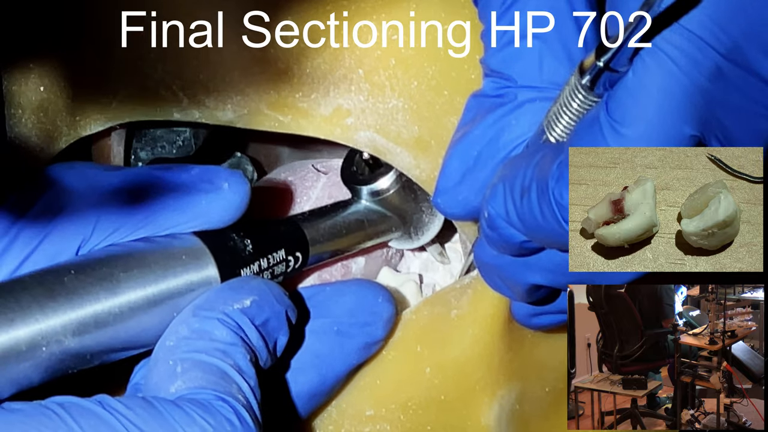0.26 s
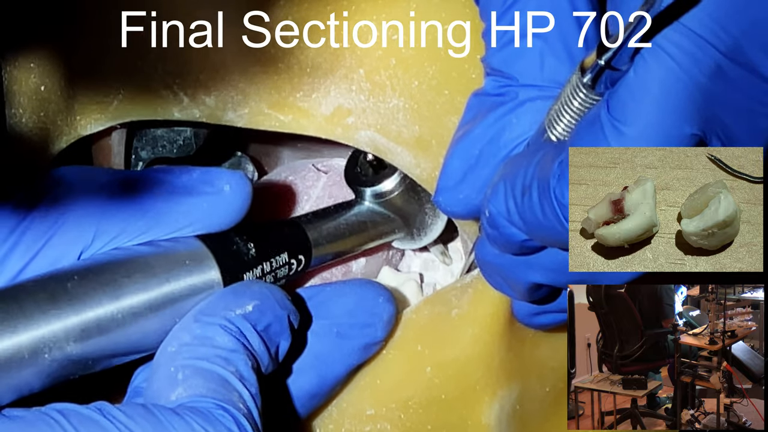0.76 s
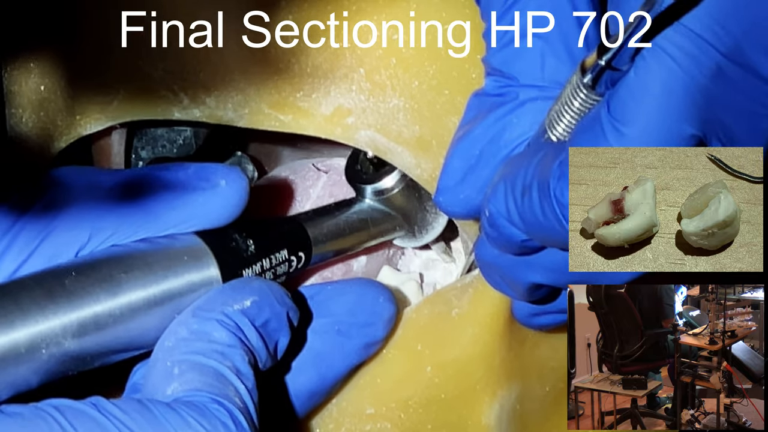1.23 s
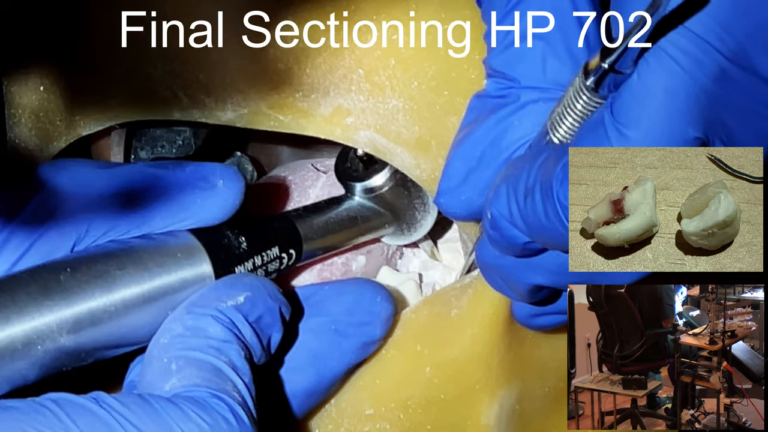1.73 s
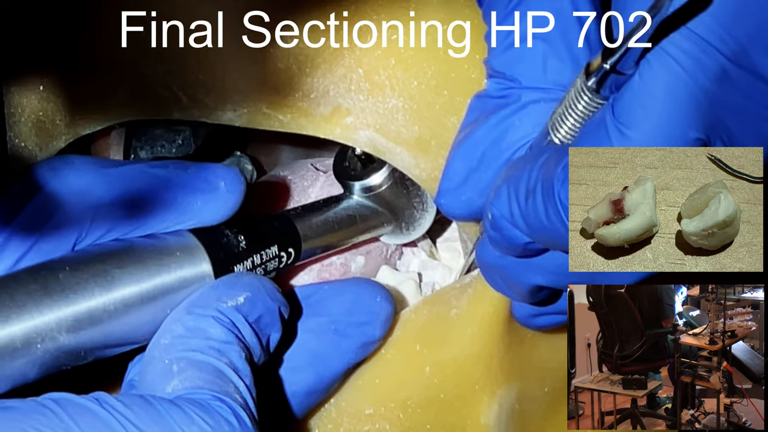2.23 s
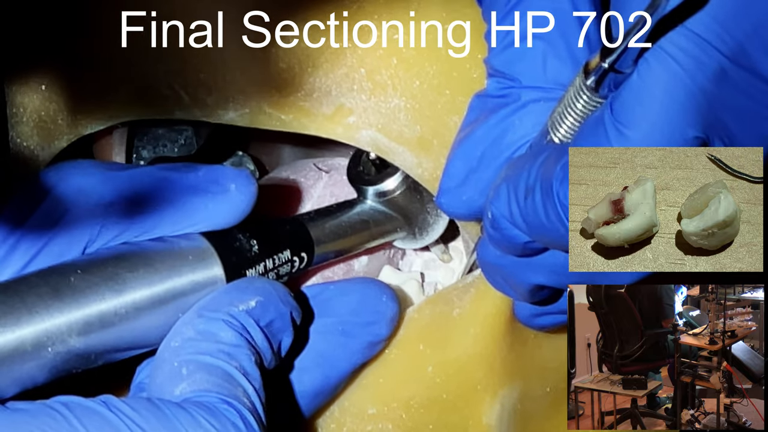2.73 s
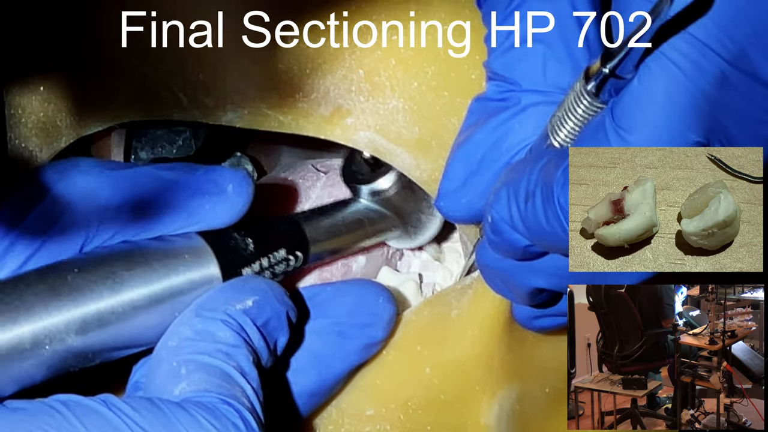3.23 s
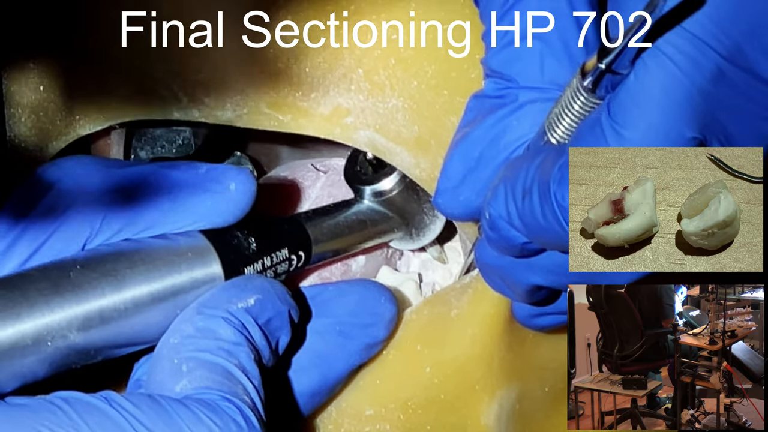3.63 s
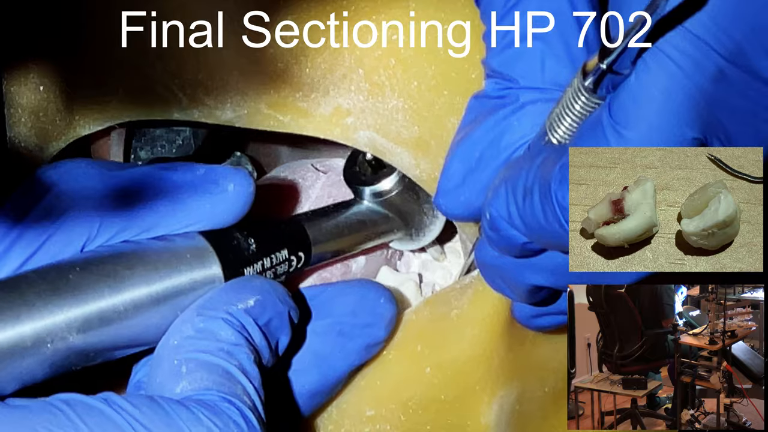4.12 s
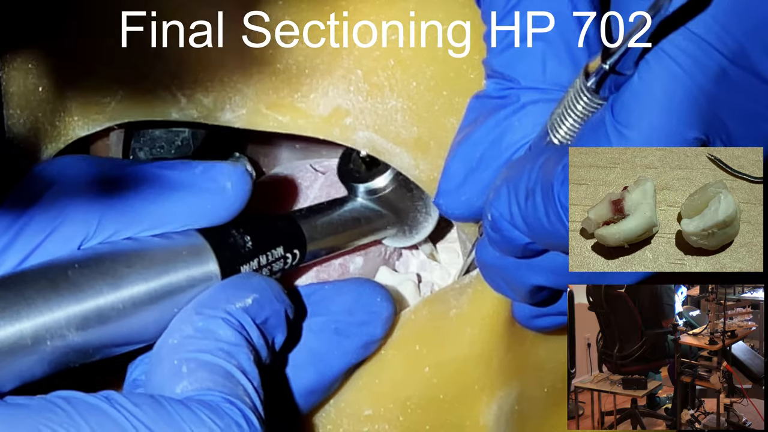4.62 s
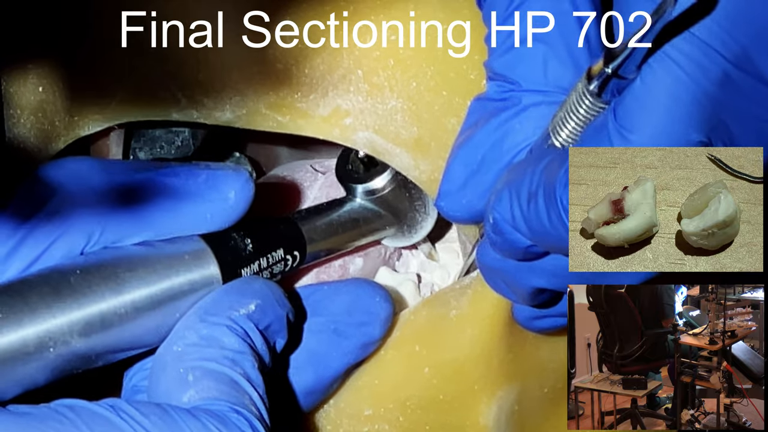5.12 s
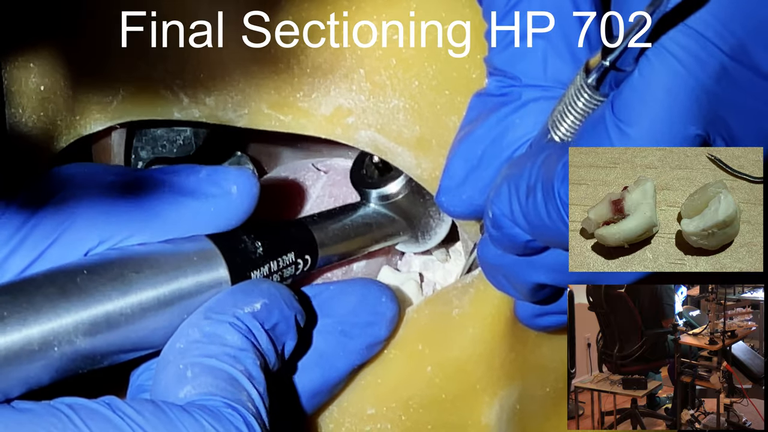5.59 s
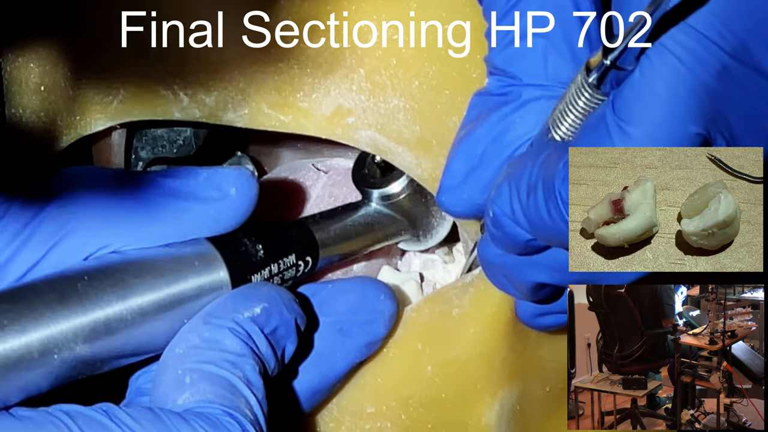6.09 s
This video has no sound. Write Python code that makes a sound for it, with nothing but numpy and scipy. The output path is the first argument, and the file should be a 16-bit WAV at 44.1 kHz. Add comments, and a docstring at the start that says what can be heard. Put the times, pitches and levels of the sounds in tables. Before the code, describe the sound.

Continuous handpiece noise, close and dry with a trace of small room. A buzzy drone opens loud and airy; then a steady hum comes forward while the rush thins a little. An extra mid-low tone swells near one second, then throbs and fades. Fine high hiss rides on top, swelling as the bur bites into the hard tooth, with brief scratchy rattles, mostly early, and a few late.

```python
"""At a workbench, close to a two-port microphone, a small electric dental motor creeps up in speed
while its bur cuts a model tooth. The shaft hums, beats with the mains ripple and whines at its gear
orders: sines locked to the shaft angle. Shaped noise makes the rushing drone around it.
The bur's hiss is noise swelling once a turn through resonances; it bites in swells and chatters in
bursts of blows, and two soft, low bumps come through the bench."""
import sys
import numpy as np
from scipy import signal
from scipy.fft import rfft, irfft, next_fast_len
from scipy.io import wavfile
from scipy.ndimage import uniform_filter1d, map_coordinates

SR = 44100
rng = np.random.default_rng(int(sys.argv[2]) if len(sys.argv) > 2 else 0)


def digitize_waveform(pressure):
    """Quantize a signal to 16-bit integers and store it at the path in sys.argv[1].

    Rows of a 2-D input are taken as channels; values are limited to [-1, 1].
    """
    field = np.atleast_2d(pressure).T
    bounded = np.clip(field, -1, 1)
    quanta = np.round(bounded * 32767).astype(np.int16)
    wavfile.write(sys.argv[1], SR, quanta)


N = 280102  # samples
RIPPLE_HZ = 120  # torque ripple, twice the mains frequency


def amp(db):
    """Decibel law: a level in dB as an amplitude ratio."""
    return 10 ** (np.asarray(db) / 20)


def unit(x):
    """Normalisation to an rms of 1."""
    return x / np.sqrt(np.mean(x ** 2) + 1e-20)


def along(points, hz):
    """Interpolation of each column after the frequency, on a logarithmic frequency axis."""
    f, *columns = np.transpose(points)
    return [np.interp(np.log(hz + 1), np.log(f + 1), column) for column in columns]


def curves(rows):
    """Linear interpolation in time: one value per sample for each column after the time."""
    s, *columns = np.transpose(rows)
    return [np.interp(np.arange(N) / SR, s, column) for column in columns]


def wobble(rate):
    """Slow random modulation: a smooth curve through about `rate` random knots a second."""
    coarse = np.arange(0, N + 64, 64)
    knots = rng.standard_normal(int(N * rate / SR) + 4)
    smooth = map_coordinates(knots, [coarse * rate / SR])
    return np.interp(np.arange(N), coarse, smooth)


def filtered(x, response):
    """Linear filtering: the spectrum of x times a complex response of frequency."""
    m = next_fast_len(N + SR // 2)
    return irfft(rfft(x, m) * response(np.fft.rfftfreq(m, 1 / SR)), m)[..., :N]


def rush(spectrum, patchy_db):
    """Turbulence-like noise: two unrelated noises sharing one colour and patches of random gain, rms 1."""
    z = signal.stft(rng.standard_normal((2, N)), nperseg=512)[2]
    field = uniform_filter1d(rng.standard_normal(z.shape[1:]), 6, 0)  # smoothed over frequency
    field = uniform_filter1d(field, 14, 1)  # then over time
    pair = signal.istft(z * amp(patchy_db * unit(field)), nperseg=512)[1][:, :N]
    return unit(filtered(pair, lambda hz: amp(along(spectrum, hz)[0])))


def resonate(x, hz, width):
    """Resonance: a damped second-order band-pass applied twice, brought to rms 1."""
    def response(f):
        return (1j * f * width / (hz * hz - f * f + 1j * f * width)) ** 2
    return unit(filtered(x, response))


def shaft_speed():
    """Rotation rate of the shaft in Hz, creeping upward."""
    # Run-up of the shaft: t/s, speed f/Hz
    speed_points = [(0.0, 324.48), (0.4, 326.16), (0.8, 327.7), (1.1, 328.51), (1.5, 329.67), (1.8, 330.68),
                    (2.2, 331.52), (2.5, 331.87), (3.0, 332.76), (3.6, 333.55), (4.0, 333.91),
                    (4.4, 334.35), (4.8, 334.76), (5.15, 334.73), (5.5, 335.37), (5.9, 335.6),
                    (6.3, 336.09)]
    return curves(speed_points)[0]


def gained():
    """Speed increment: Hz of shaft speed gained since the start."""
    speed = shaft_speed()
    return speed - speed[0]


def shaft_angle():
    """Integration of speed: radians turned by the shaft."""
    return 2 * np.pi * np.cumsum(shaft_speed()) / SR


def shaft_orders(angle):
    """Order tones: harmonics of rotation, here the shaft tone and the gear whines at orders 12 and 22."""
    # Strong orders: t/s, shaft tone level/dB, order 12 level/dB, order 22 level/dB
    order_levels = [(0, -47, -54, -54), (.25, -39, -66, -57), (.48, -34, -63, -56), (.62, -32.5, -53, -56),
                    (.82, -30.5, -50.5, -59), (.88, -29.5, -51, -49.5), (1.2, -28.5, -58, -49),
                    (1.62, -26, -48.5, -53.5), (1.72, -24.5, -50, -53), (1.85, -24.5, -62, -53.5),
                    (2.2, -24.5, -65, -53), (2.75, -23.5, -70, -49.5), (2.92, -23.5, -60, -51),
                    (3.05, -23, -58, -54), (3.4, -23.5, -53.5, -51.5), (4.2, -23.5, -55, -53),
                    (5.0, -24, -52.5, -51), (5.3, -23.5, -53.5, -51.5), (5.5, -24.5, -62, -51.5),
                    (6.1, -23.5, -61.5, -49.5), (6.35, -23.7, -57, -52)]
    # Depth of random flutter for the same three tones: depth/dB; gear whines waver most
    flutter_depths = [0.35, .84, 1.05]
    tones = np.zeros(N)
    for order, db, depth_db in zip((1, 12, 22), curves(order_levels), flutter_depths):
        tones += amp(db + depth_db * wobble(16)) * np.sin(order * angle)
    return tones


def side_tones(angle, ripple):
    """Intermodulation: sums and differences of order and ripple phases; some are pure orders or ripple."""
    # Tones that grow or fade with speed: shaft order, multiple of the ripple, level at start/dB,
    # slope/(dB per Hz of speed gained), flutter depth/dB, slow swing depth/dB
    side_rows = [(1, -1, -63, 1.08, 1.9, 0.2), (1, 1, -45.5, -0.72, 1.5, 1.7), (2, 0, -49, -.5, 1.2, 0.5),
                 (0, 1, -54.5, -.5, 3, 1), (30, 0, -58, -0.38, 0.5, 2.5), (1, 2, -47, -2.3, 0.5, 3),
                 (21, 0, -63, -1, 4, 5)]
    tones = np.zeros(N)
    for order, multiple, db, slope_db, flutter_db, swing_db in side_rows:
        level_db = db + slope_db * gained() + flutter_db * wobble(16) + swing_db * wobble(3.047)
        tones += amp(level_db) * np.sin(order * angle + multiple * ripple)
    return tones


def faint_orders(angle):
    """Weak rotational harmonics: the faint orders come and go as the load shifts."""
    # Faint orders: shaft order, mean level/dB
    faint_rows = [(3, -79), (8, -70), (10, -71), (15, -92), (16, -76), (18, -77), (23, -87), (24, -75),
                  (26, -72), (27, -68.5), (37, -81)]
    # order ** 2 only scatters the starting phases
    return sum(amp(db + 2.0 * wobble(1.5)) * np.sin(order * angle + order ** 2) for order, db in faint_rows)


def resonant_db():
    """Resonance crossing: the level climbs to a sharp peak in speed, then falls and throbs by interference."""
    peak_speed_hz, peak_db, rounding_hz = 329, -31.5, 0.33  # rounding lowers and blunts the peak
    climb_db_per_hz, fall_db_per_hz = 5.5, 4
    throb_from_s, throb_grows_s, throb_share = 1.36, 0.19, 0.37
    first_dip_s, throb_per_s, throb_gain_per_s2 = 1.67, 1.75, .76  # rate at the first dip, and its growth
    t = np.arange(N) / SR
    past = shaft_speed() - peak_speed_hz
    away_db = np.hypot(past, rounding_hz) * np.where(past < 0, climb_db_per_hz, fall_db_per_hz)
    share = throb_share * np.clip((t - throb_from_s) / throb_grows_s, 0, 1)
    since_dip = t - first_dip_s
    cycles = since_dip * (throb_per_s + throb_gain_per_s2 * since_dip / 2)
    throb_db = 20 * np.log10(np.abs(1 - share * np.exp(2j * np.pi * cycles)))
    return peak_db - away_db + throb_db


def resonant_tone(angle, ripple):
    """Swept excitation of a resonance: twice the shaft speed less the ripple climbs through it."""
    return amp(resonant_db() + 0.6 * wobble(10)) * np.sin(2 * angle - ripple)


def motor(angle):
    """Superposition of shaft orders and their sums and differences with the torque ripple."""
    ripple = 2 * np.pi * RIPPLE_HZ * np.arange(N) / SR
    tones = shaft_orders(angle) + resonant_tone(angle, ripple)
    tones += side_tones(angle, ripple) + faint_orders(angle)
    return np.sqrt(2) * tones  # so that the levels are rms levels


def room(x, delay, t60, wet_db):
    """Reverberation: direct sound plus one fixed, decaying tail of reflections that ripples the spectrum."""
    t = np.arange(SR // 2) / SR
    tail = rng.standard_normal(len(t)) * amp(-60 * t / t60)
    tail *= t > delay  # silent until the first wall answers
    answer = amp(wet_db) * unit(tail) / np.sqrt(len(t))
    answer[0] = 1
    answer /= np.linalg.norm(answer)
    return signal.fftconvolve(x, answer[None], axes=1)[:, :N]


def drone():
    """Broadband radiation: spectrally shaped noise of the motor, its housing and moving air."""
    # Course of the layers, before the fixed gains below: t/s, drone level/dB, buzz level/dB, air level/dB
    layer_levels = [(0, -38, -48.5, -50), (.3, -37.3, -50, -51.5), (1.1, -37.5, -49, -50),
                    (1.8, -39, -51, -51.7), (2.4, -40, -51.5, -52), (2.88, -39, -52, -53),
                    (3.45, -41.5, -54, -53.5), (4, -41.5, -51.5, -54), (4.45, -42, -52.5, -54.5),
                    (4.8, -41.5, -54, -54.5), (5.25, -41.5, -52, -54.5), (5.9, -41.5, -55, -54),
                    (6.35, -41, -55, -53)]
    # Relative spectra of motor drone, housing buzz, moving air and the room's steady floor: f/Hz, level/dB
    drone_spectrum = [(550, -15), (700, -20.5), (850, -5), (1050, -0.5), (1250, -3), (1380, -2), (1530, 1),
                      (1680, -5.5), (1850, -5), (2100, -16), (2600, -23.5), (4000, -60)]
    buzz_spectrum = [(150, -30), (220, -11), (270, -17), (310, 3.5), (380, -3), (480, -2.5), (570, -20),
                     (640, -6.5), (720, -5), (900, -33.5)]
    air_spectrum = [(1200, -32), (2000, 0), (3000, -1), (4500, -4), (6000, -12), (7500, -5.5), (9000, -13),
                    (10200, -9.5), (11300, -7.5), (12000, -14), (12600, -17.5)]
    floor_spectrum = [(20, -14), (50, -13), (70, -8), (100, -6), (170, -2), (230, 0), (300, -20)]
    # Narrow housing modes, following the level of the buzz: f/Hz, width/Hz, relative level/dB
    housing_modes = [(348, 38, -0.5), (417.7, 22, -5.5), (464, 30, -4), (534, 28, -1)]
    drone_db, buzz_db, air_db = curves(layer_levels)
    far = amp(drone_db + 4) * rush(drone_spectrum, patchy_db=1.13)
    far += amp(air_db + 5) * rush(air_spectrum, patchy_db=1.14)
    far = room(far, delay=.012, t60=.35, wet_db=-10)
    modes = sum(amp(db) * resonate(rng.standard_normal((2, N)), hz, width) for hz, width, db in housing_modes)
    housing = amp(5.5) * rush(buzz_spectrum, patchy_db=1.0) + amp(1) * modes
    floor = amp(-63.5) * rush(floor_spectrum, patchy_db=2)
    return far + floor + amp(buzz_db) * housing


def strikes(angle, turns):
    """Periodic impact: one sharp blow every so many turns, rms 1."""
    return unit(np.exp(1500 / turns * (np.cos(angle / turns) - 1)))


def bite_gain(mode_hz, start_db, slope_db):
    """Power addition in one resonance: the steady grind plus every bite whose hiss lies near it."""
    # Bites of the bur: t/s, length/s, peak level/dB, first hiss pitch f/Hz, last hiss pitch f/Hz
    bites = [(.45, .33, -56, 9600, 9000), (.5, .7, -56, 6000, 6000), (1.3, .2, -57, 6000, 6000),
             (1.846, .75, -48, 8600, 11100), (1.9, 0.52, -57, 6000, 6000), (2.82, .35, -57.5, 6000, 6000),
             (3.04, 0.19, -50.5, 10600, 10200), (3.62, .25, -57, 6000, 6000),
             (3.78, 0.34, -56.5, 9600, 10700), (4.15, .22, -63, 10000, 10000),
             (4.65, .55, -57, 9700, 11100), (5.416, 0.8, -50, 10400, 9600), (5.95, 0.25, -58, 6000, 6000)]
    spread_hz, edge = 790, 0.29  # reach of the hiss round its pitch; share of a bite rising, and falling
    t = np.arange(N) / SR
    # 1.94 rather than 2 turns dB into power, compressing the level range slightly
    power = amp(1.94 * (start_db + slope_db * gained() + 1.0 * wobble(5.2)))
    for s, length, db, first_hz, last_hz in bites:
        u = np.clip((t - s) / length, 0, 1)
        pitch_hz = first_hz + (last_hz - first_hz) * u
        near = np.exp(-((pitch_hz - mode_hz) / spread_hz) ** 2)
        envelope = np.clip(np.minimum(u, 1 - u) / edge, 0, 1)
        power += near * (amp(db) * envelope) ** 2
    return np.sqrt(power)


def scrape(angle):
    """Forced resonance: grit scrapes hardest once a turn, and the high flute strikes the tooth."""
    # Resonances of tooth and bur: f/Hz, width/Hz
    tooth_modes = [(8870, 1400), (9870, 1500), (11070, 860), (6020, 1240)]
    # Steady scrape in each of these, before bite_gain's compression:
    # level at start/dB, slope/(dB per Hz of speed gained)
    grind_levels = [(-59, -0.64), (-54.5, -0.65), (-63.5, -0.43), (-57.5, -0.52)]
    swing = 1 + .22 * np.cos(angle)
    # the flute goes only to the first signal, which both ports share
    flute = 0.5 * strikes(angle, 1) * amp(3 * wobble(8)) * [[1], [0]]
    out = np.zeros((2, N))
    for (start_db, slope_db), (hz, width) in zip(grind_levels, tooth_modes):
        grit = rng.standard_normal((2, N)) * swing * amp(1.3 * wobble(40))
        out += bite_gain(hz, start_db, slope_db) * resonate(grit + flute, hz, width)
    return out


def ring(force, centre_hz, q):
    """Ringing: a resonant peak filter applied twice to a force, brought to rms 1."""
    b, a = signal.iirpeak(centre_hz, q, SR)
    return unit(signal.lfilter(b, a, signal.lfilter(b, a, force)))


def chatter(angle):
    """Subharmonic impact: the biting bur bounces every second turn, ringing near 4 kHz, weakly at 6."""
    # Bursts of chatter: t/s, length/s, level/dB, centre f/Hz, roughness (0 blows to 1 noise)
    bursts = [(0.715, 0.05, -45.5, 4100, 0.65), (.755, .06, -51, 4200, .4), (.81, .08, -53, 4200, 1),
              (0.888, .035, -49, 4130, 0.8), (.92, .03, -51, 4180, .8), (1.01, .03, -52, 4200, .8),
              (1.056, .035, -49, 4200, 0.7), (1.19, 0.07, -48, 4150, 0.65), (1.24, 0.07, -48.5, 4200, 0.5),
              (1.294, .055, -55, 4350, .35), (1.69, .05, -54, 4250, .5), (2.81, .04, -57, 4120, 0.6),
              (2.85, .05, -54, 4180, .6), (3.005, .055, -53, 4300, 0.5), (3.66, .06, -59, 4220, .5),
              (5.81, .07, -55, 4280, .2), (6.06, 0.1, -49.5, 4230, 0.2), (6.143, .035, -54, 4100, 0.9)]
    blows, out = strikes(angle, 2), np.zeros(N)
    for s, length, db, hz, rough in bursts:
        part = slice(round(s * SR), round((s + length) * SR))
        noise = rng.standard_normal(N)[part]
        force = (1 - rough) * blows[part] + rough * noise
        tone = ring(force, hz, q=8) + amp(-13) * ring(force, 6000, q=14)
        out[part] += amp(db) * np.sqrt(np.hanning(len(force))) * tone
    return out


def bumps():
    """Low-frequency structural vibration: a soft push makes the bench swing a few times."""
    # Soft bumps through the bench: t/s, length/s, peak level/dB, f/Hz
    pushes = [(1.01, .16, -45, 65), (1.09, .23, -42, 66)]
    t = np.arange(N) / SR
    out = np.zeros(N)
    for s, length, db, hz in pushes:
        envelope = np.sin(np.pi * np.clip((t - s) / length, 0, 1)) ** 2
        out += amp(db) * envelope * np.sin(2 * np.pi * hz * t)
    return out


def ports(direct, diffuse):
    """Interaural-like coherence: each port has its own level and phase; noise is only partly alike."""
    # The two ports: f/Hz, likeness (0-1), phase by which left leads/rad, left over right level/dB
    port_points = [(40, .88, -.4, 1.2), (120, .85, -.5, .8), (215, .9, -.49, -.6), (335, .96, -.43, -.45),
                   (455, .92, -.43, -2), (600, .6, -.3, -4), (760, .3, 1.3, 1), (900, .65, 1.6, 7),
                   (1150, .75, 1.9, 4), (1500, .88, 1.9, -1), (1900, .65, 2.2, -2), (2200, .1, 1, -.5),
                   (3200, .2, -1.2, -.5), (4100, .6, -.4, -2), (5200, .15, -.5, -5), (6200, .35, 0, -5.5),
                   (6900, .4, -.4, -4), (7170, .5, -2.4, -6), (7230, .55, -1.9, -6), (7340, .55, -2.4, -5),
                   (7800, .42, -1.6, 0), (8500, .7, -.3, 1.5), (9000, .85, .5, 0), (10200, .95, 2.9, 0),
                   (11700, .9, 6, 0), (11900, .9, 6.28, 0), ]
    sign = np.array([[1], [-1]])  # left, right

    def mix(hz):
        # cos^2 - sin^2 of this angle equals the likeness
        turn = np.arccos(np.clip(along(port_points, hz)[0], 0, 1)) / 2
        return np.array([np.cos(turn), np.sin(turn)])

    def path(hz):
        _, lead, level_db = along(port_points, hz)
        return amp(sign * level_db / 2) * np.exp(.5j * sign * lead)

    shared, apart = filtered(diffuse, mix)
    return filtered(direct + shared + sign * apart, path)


def scene():
    """Superposition: tonal and impact sounds reach the ports coherently, noisy ones diffusely."""
    angle = shaft_angle()
    direct = motor(angle) + chatter(angle) + bumps()
    diffuse = drone() + scrape(angle)
    return ports(direct, diffuse)


def record(dry):
    """Band limitation: the microphone loses the deep bass; the recorder keeps nothing above its limit."""
    low_hz, top_hz = 60, 12581
    return filtered(dry, lambda hz: (hz < top_hz) * hz ** 2 / (hz ** 2 + low_hz ** 2))


dry = scene()
out = record(dry)
digitize_waveform(out)
```